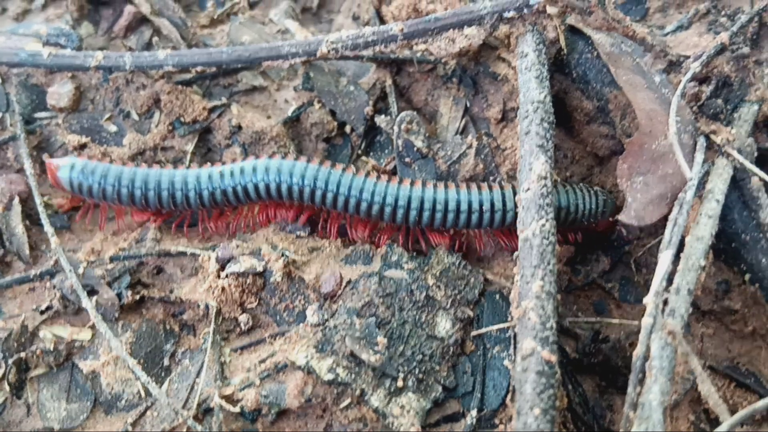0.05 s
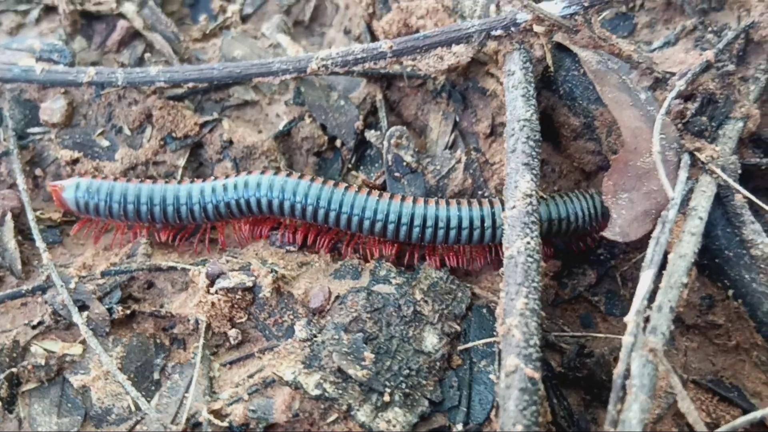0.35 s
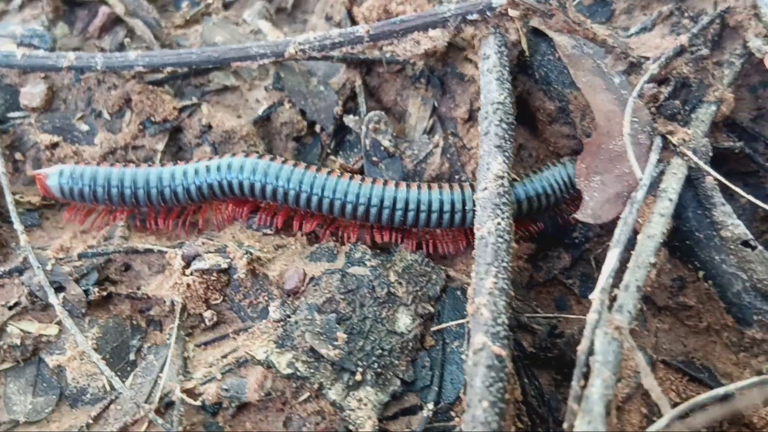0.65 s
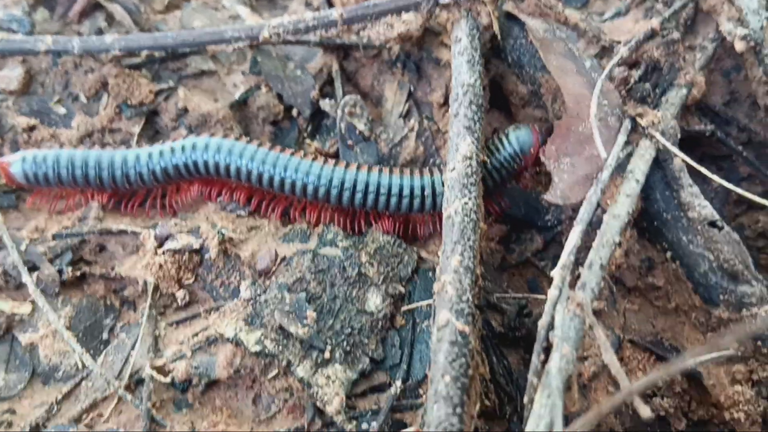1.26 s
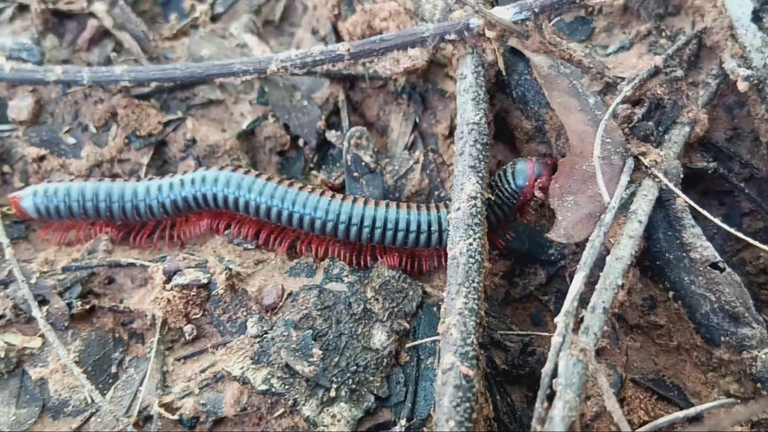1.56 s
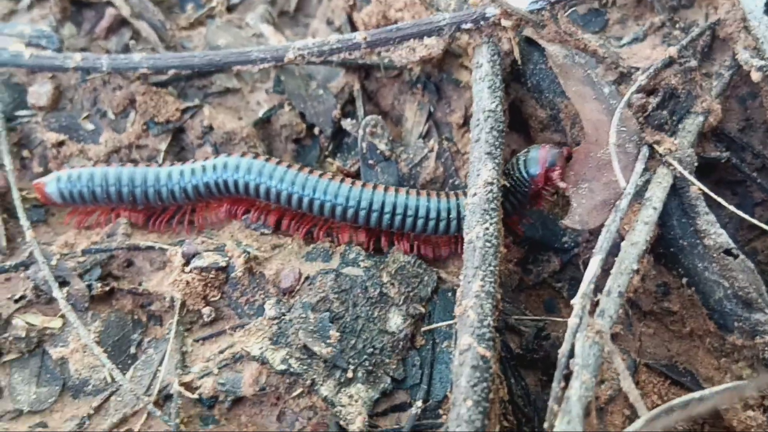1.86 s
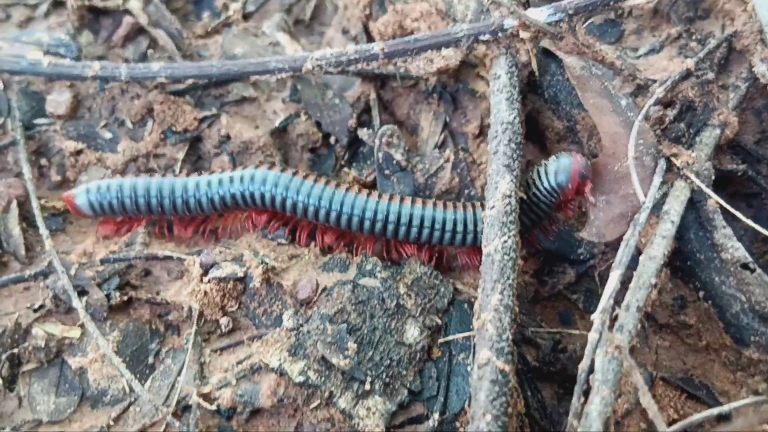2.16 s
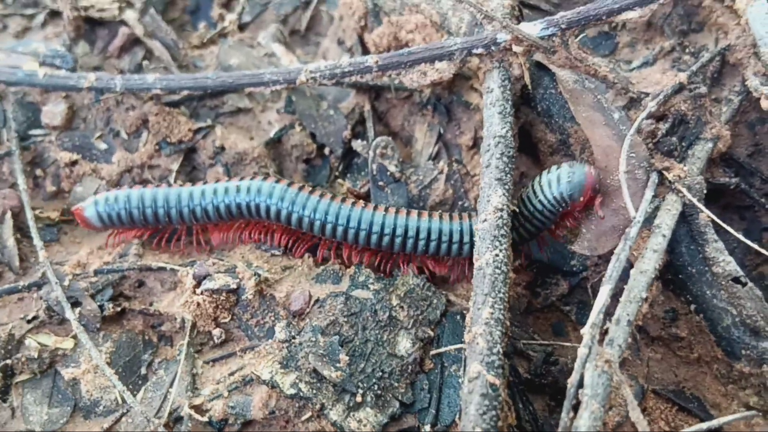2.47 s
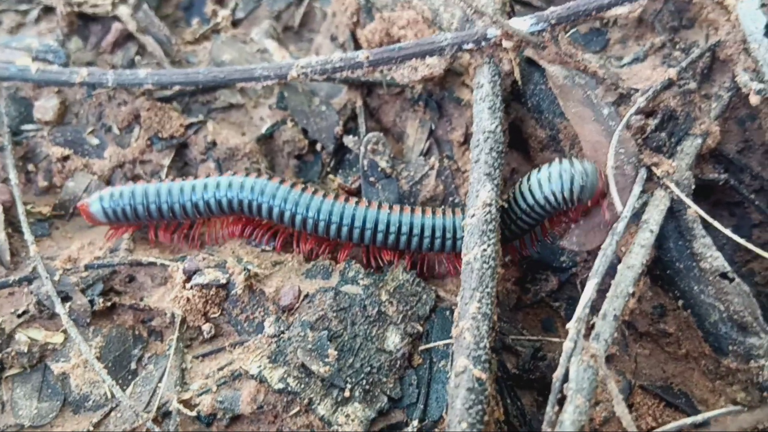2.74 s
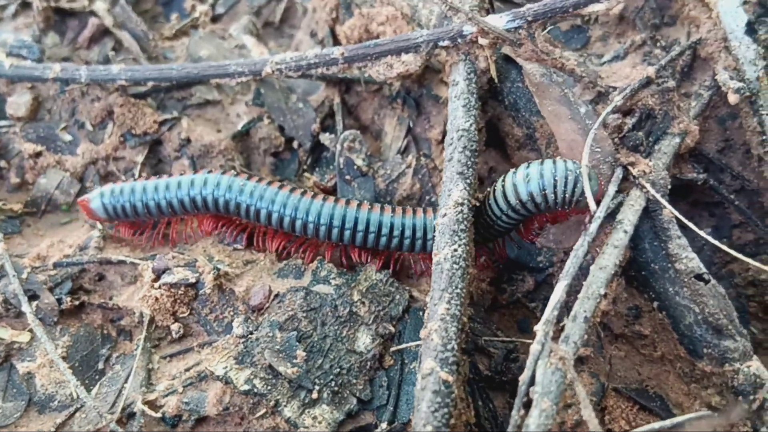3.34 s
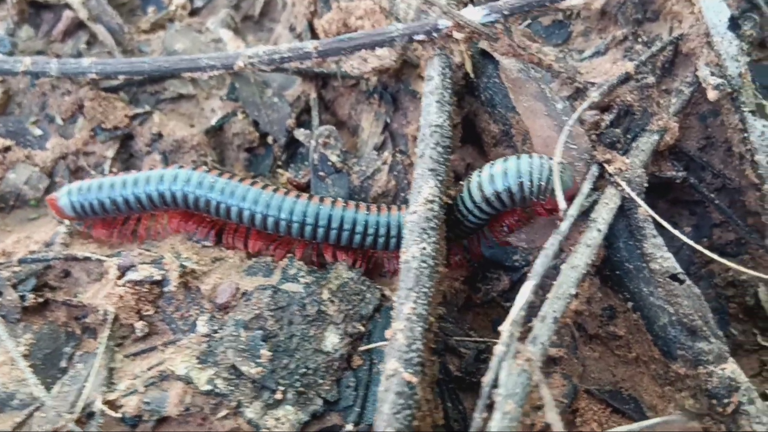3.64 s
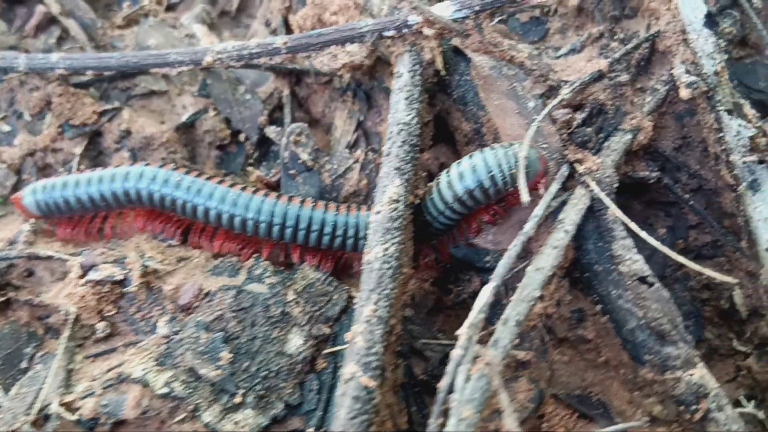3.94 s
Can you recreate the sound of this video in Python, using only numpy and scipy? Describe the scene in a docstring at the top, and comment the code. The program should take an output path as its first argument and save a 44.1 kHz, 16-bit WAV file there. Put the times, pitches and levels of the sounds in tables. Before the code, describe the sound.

A passing vehicle's rumble and distant hum grow into a rushing roar and hiss.

```python
"""A vehicle passing on a road

A motor vehicle approaches and passes two microphones close to the ground. Its exhaust rumbles
throughout; a far tyre hum grows into a roar and a bright hiss, loudest after about three seconds,
with two engine tones beneath. Its body rattles twice. Before that an insect buzzes faintly, a leaf
rustles and the microphones take a few soft bumps. All but the tones and bumps is shaped noise."""
import sys
import numpy as np
from scipy import signal
from scipy.fft import rfft, irfft
from scipy.io import wavfile
from scipy.ndimage import uniform_filter1d, minimum_filter1d

SR = 44100
rng = np.random.default_rng(int(sys.argv[2]) if len(sys.argv) > 2 else 0)


def generate_wav(sig):
    """Save sig (samples, or channels by samples) to the path in sys.argv[1] as 16-bit PCM at SR."""
    pcm = np.round(np.clip(np.atleast_2d(sig).T, -1, 1) * 32767).astype(np.int16)
    wavfile.write(sys.argv[1], SR, pcm)


N = 176400

# envelope of the tyre roar, which the engine tones also follow: (time [s], level [dB])
ROAR_LEVEL = [(0, -44.5), (1.1, -25), (1.45, -20.5), (1.65, -17), (2, -12.5), (2.3, -8), (2.65, -5.5),
              (2.95, -1.1), (3.25, -0.3), (3.45, -3), (3.8, -2.5), (4, -2)]


def from_db(db):
    """Amplitude grows tenfold for every 20 dB."""
    return 10 ** (np.asarray(db) / 20)


def unit_rms(x):
    """Normalisation to a mean power of 1."""
    return x / np.sqrt(np.mean(x ** 2) + 1e-20)


def seconds():
    """The time of each sample."""
    return np.arange(N) / SR


def bin_hz():
    """The frequency of each Fourier bin."""
    return np.arange(N // 2 + 1) * SR / N


def in_time(rows):
    """Linear interpolation of (time [s], value) rows."""
    return np.interp(seconds(), *np.transpose(rows))


def at_hz(rows, hz):
    """Interpolation of every column of a table on a log-frequency axis."""
    points, *columns = np.transpose(rows)
    return np.array([np.interp(np.log(hz), np.log(points), c) for c in columns])


def drift(rate_hz):
    """Low-passed noise gives slow random motion with a spread of 1."""
    step, settling = 40, 2000
    pole = np.exp(-2 * np.pi * rate_hz * step / SR)
    noise = rng.standard_normal(N // step + settling + 2)
    slow = signal.lfilter([1], [1, -2 * pole, pole * pole], noise)[settling:]
    return np.interp(np.arange(N) / step, np.arange(len(slow)), unit_rms(slow))


def stereo_noise(spectrum):
    """Coloured noise at spaced microphones loses coherence as the wavelength shortens."""
    # likeness of the two microphones: (frequency [Hz], coherence [0-1])
    likeness = [(200, 1), (400, 0.62), (650, 0.81), (1000, 0.53), (1500, 0.26), (3000, 0.24), (6000, 0.08)]
    # phase of the left microphone relative to the right: (frequency [Hz], phase [rad])
    left_phase = [(430, -1.64), (620, -2.5), (750, -2.5), (950, -3), (1400, -4), (2000, -8.5),
                  (3200, -11.5)]
    hz = np.maximum(bin_hz(), 1)
    left, independent = rfft(rng.standard_normal((2, N)))
    coherence = at_hz([(110, .998)] + list(likeness), hz)[0]
    phase = at_hz(left_phase, hz)[0] * np.minimum(hz / left_phase[0][0], 1)  # a pure delay in the bass
    right = (coherence * left + np.sqrt(1 - coherence ** 2) * independent) * np.exp(-1j * phase)
    roll_off = np.minimum(hz / spectrum[0][0], 1) ** 4 * np.minimum(spectrum[-1][0] / hz, 1) ** 8
    return irfft(np.array([left, right]) * from_db(at_hz(spectrum, hz)) * roll_off * np.sqrt(SR / 2), N)


def narrow_noise(hz, width_hz):
    """Random modulation in quadrature spreads a tone into a thin band of noise."""
    phase = 2 * np.pi * np.cumsum(hz) / SR
    return drift(width_hz) * np.cos(phase) + drift(width_hz) * np.sin(phase)


def airy_note(curve, width_hz, right_db):
    """Narrow-band noise is heard as a pitch; it glides, incoherent between the microphones."""
    times, hz, db = np.transpose(curve)
    pitch, level = np.interp(seconds(), times, hz), np.interp(seconds(), times, db)
    left, right = narrow_noise(pitch, width_hz), narrow_noise(pitch, width_hz)
    return np.array([left, from_db(right_db) * right]) * from_db(level)


def split_bands(x, band_of_bin, count):
    """A bank of overlapping triangular filters divides a sound into bands."""
    spectrum = rfft(x)
    return (irfft(spectrum * np.maximum(1 - abs(band_of_bin - k), 0), N) for k in range(count))


def flutter(x, shared_db, octave_db, rate_hz):
    """Amplitude modulation by air and road: the level wavers as a whole and octave by octave."""
    octave = np.log2(np.maximum(bin_hz() / 32, 1))
    out = sum(band * from_db(octave_db * drift(rate_hz)) for band in split_bands(x, octave, 10))
    return out * from_db(shared_db * drift(rate_hz))


def shimmer(x, depth_db, rate_hz, count=44):
    """Frequency-selective fading: over a long path, narrow bands swell and sink independently."""
    place = np.interp(np.log(np.maximum(bin_hz(), 1)), np.log([400, 12000]), [0, count - 1])
    return sum(band * from_db(depth_db * drift(rate_hz)) for band in split_bands(x, place, count))


def scatter(x, share, spread_s, count=12):
    """Comb filtering: short echoes from the ground and plants interfere with the direct sound."""
    out = x.copy()
    for channel in range(2):
        for delay, sign in zip(rng.random(count), rng.choice([-1, 1], count)):
            echo = np.roll(x[channel], int((0.1018 + delay) * spread_s * SR))
            out[channel] += sign * share / np.sqrt(count) * echo
    return out / np.sqrt(1 + share ** 2)


def brighten(x, tilt, hinge_hz):
    """Spectral tilt above a hinge: the treble comes through only when the vehicle is close."""
    octave = np.log2(np.maximum(bin_hz() / hinge_hz, 1))
    slope = in_time(tilt)
    return sum(band * from_db(k / 2 * slope) for k, band in enumerate(split_bands(x, 2 * octave, 7)))


def outdoor_air():
    """Ambient noise: a faint hiss that fades band by band."""
    # spectral density of the hiss: (frequency [Hz], left [dB], right [dB])
    spectrum = [(400, -97, -106), (2000, -117, -125), (4000, -105, -109), (5400, -112, -106),
                (6600, -99, -110), (7750, -105, -105), (8300, -115, -105), (9400, -122, -92.5),
                (10040, -127, -95), (11370, -129, -112), (15500, -127, -125)]
    return shimmer(stereo_noise(spectrum), depth_db=2.2, rate_hz=12)


def leaf_rustle():
    """A dry leaf shifts nearby: a burst of treble noise under a Gaussian envelope."""
    # spectral density at the peak: (frequency [Hz], left [dB], right [dB])
    spectrum = [(6000, -108, -110), (6800, -89, -96), (7400, -106, -104), (8500, -100, -95),
                (10000, -112, -89), (12000, -118, -104)]
    peak_s, spread_s = 1.135, 0.02
    return stereo_noise(spectrum) * np.exp(-.5 * ((seconds() - peak_s) / spread_s) ** 2)


def insect():
    """Narrow-band noise makes two short buzzes and a thin whine that arches in pitch."""
    # course of the whine: (time [s], pitch [Hz], level [dB])
    whine = [(1.2, 7600, -92), (1.33, 7660, -71), (1.73, 7780, -67.5), (1.97, 7680, -69), (2.13, 7500, -62),
             (2.35, 7450, -88)]
    # buzzes: (start [s], duration [s], level [dB], centre [Hz], bandwidth [Hz], right gain [dB])
    buzzes = [(0.49, 0.45, -61.5, 6600, 420, -8), (1.62, 0.75, -60, 6620, 400, -7)]
    fade_s, t = 0.18, seconds()
    out = airy_note(whine, width_hz=32, right_db=-10)
    for start, duration, db, hz, width_hz, right_db in buzzes:
        band = signal.butter(2, [hz - width_hz / 2, hz + width_hz / 2], "band", fs=SR, output="sos")
        envelope = np.clip(np.minimum(t - start, start + duration - t) / fade_s, 0, 1)
        flicker = from_db(2.4 * drift(40))
        buzz = unit_rms(signal.sosfilt(band, rng.standard_normal((2, N))))
        out += envelope * flicker * buzz * from_db([[db], [db + right_db]])
    return out


def microphone_bumps():
    """Soft knocks excite heavily damped oscillations, mostly in the left microphone."""
    # knocks: (time [s], envelope peak [dB], frequency [Hz], rise time [s], right gain [dB])
    knocks = [(.535, -33, 560, .0026, -13), (.658, -9, 135, .004, -6), (.7505, -14.5, 320, .0025, -16),
              (1.053, -10, 75, .005, -6), (1.446, -5, 105, .0045, -6)]
    out = 0
    for start, db, hz, rise_s, right_db in knocks:
        age = np.maximum(seconds() - start, 0)
        envelope = (age / rise_s * np.exp(1 - age / rise_s)) ** 2
        out += from_db([[db], [db + right_db]]) * envelope * np.sin(2 * np.pi * hz * age)
    return out


def far_resonances():
    """Resonances in the distant road noise waver in pitch and fade independently."""
    # resonant bands: (centre [Hz], width [Hz], level before the envelope [dB])
    resonances = [(703, 36, -61.5), (907, 40, -62), (1376, 40, -57.5), (1648, 40, -57.5), (1815, 37, -62.5),
                  (2020, 35, -64.5), (2410, 50, -66), (3360, 60, -75), (3760, 100, -69.5)]
    # their common envelope: (time [s], level [dB])
    envelope = [(0, -7), (.3, 0), (.8, -1), (1.4, 3.5), (2.2, 5), (3, 6)]
    wander, fading_db, right_db = .008, 4, -7
    out = 0
    for hz, width_hz, db in resonances:
        pitch = hz * (1 + wander * drift(3.95))
        left, independent = narrow_noise(pitch, width_hz), narrow_noise(pitch, width_hz)
        right = from_db(right_db) * (independent - left) / np.sqrt(2)  # partly in antiphase
        out += from_db(db + fading_db * drift(7.7)) * np.array([left, right])
    return out * from_db(in_time(envelope))


def tyre_hum():
    """Distant rolling noise fades in patches and steadies as the path shortens."""
    # spectral density of the hum: (frequency [Hz], left [dB], right [dB])
    spectrum = [(500, -80, -73), (730, -71.5, -72.5), (856, -61, -68), (1000, -62, -71), (1110, -65.5, -69),
                (1240, -61, -70.5), (1960, -63.5, -69.5), (2415, -65.5, -69), (3220, -74, -76),
                (3580, -74, -83.5), (3930, -74, -84.5), (4470, -93, -86.5), (5400, -102, -93.5),
                (6400, -85, -85), (7730, -87.5, -93.5), (9300, -121, -79), (12000, -155, -109)]
    # fading of its narrow bands: (time [s], depth [dB])
    fading = [(0, 4.5), (1.4, 4), (2.3, 1.5)]
    # its envelope: (time [s], level [dB])
    envelope = [(0, -31.5), (0.6, -22), (0.9, -21.5), (1.4, -16.5), (1.8, -7.5), (2.2, -4), (2.6, -0.5),
                (3.2, 0.5), (4, -6.5)]
    hum = shimmer(stereo_noise(spectrum), depth_db=in_time(fading), rate_hz=9.8)
    return flutter(hum, shared_db=0.6, octave_db=0.95, rate_hz=21) * from_db(in_time(envelope))


def tyre_singing():
    """A spectral peak in the tyre noise sings out early in the approach."""
    # spectral density of the peak: (frequency [Hz], left [dB], right [dB])
    spectrum = [(1170, -85.5, -97), (1344, -73, -80.5), (1660, -80.5, -98)]
    # its envelope: (time [s], level [dB])
    envelope = [(0, -31), (.89, -17), (.93, -1), (1.1, -3), (1.38, 5.5), (1.55, 5.5), (2, 1)]
    return stereo_noise(spectrum) * from_db(in_time(envelope))


def high_ringing():
    """Narrow-band noise rings near 6.7 kHz, swells with the passing hiss and sinks slightly in pitch."""
    # course of the ringing: (time [s], pitch [Hz], level [dB])
    ringing = [(2.3, 6850, -75), (2.65, 6820, -52), (2.95, 6770, -42), (3.2, 6640, -45), (3.5, 6600, -60),
               (4, 6560, -53)]
    return airy_note(ringing, width_hz=77, right_db=-2)


def body_rattles():
    """The body clatters in noise bursts with a linear attack and an exponential decay."""
    # clatters: (time [s], peak gain [dB])
    clatters = [(3.439, -23), (3.741, -26)]
    # their spectral density: (frequency [Hz], left [dB], right [dB])
    spectrum = [(900, -24, -42), (2500, -37.5, -37), (3900, -27, -42), (4960, -50, -42), (6740, -40, -38.5),
                (10000, -67, -58)]
    attack_s, t60_s = 0.0047, 0.069
    envelope = 0
    for start, db in clatters:
        age = np.maximum(seconds() - start, 0)
        decay_db = 60 * np.maximum(age - attack_s, 0) / t60_s
        envelope += np.minimum(age / attack_s, 1) * from_db(db - decay_db)
    return envelope * stereo_noise(spectrum)


def tyre_hiss():
    """High-frequency rolling noise, combed by echoes, is heard only at close range."""
    # spectral density of the hiss: (frequency [Hz], left [dB], right [dB])
    spectrum = [(1170, -64, -65), (1730, -64.5, -62), (2450, -60, -67.5), (3420, -64, -66),
                (3730, -57, -70.5), (3930, -60, -70), (4300, -67.5, -70), (5170, -74, -69.5),
                (5600, -71, -66), (6150, -70, -69.5), (6500, -66.5, -66.5), (6800, -66.5, -66.5),
                (7110, -74.5, -70.5), (8160, -82, -70), (9470, -88, -66.5), (10550, -97, -72.5),
                (11300, -103, -76), (13000, -110, -85), (15500, -114, -97)]
    # its brightness: (time [s], slope above the hinge [dB/octave])
    tilt = [(1.6, -9), (2.2, -1), (2.4, -0.5), (2.6, -1), (2.75, 0.3), (3, 1.4), (3.4, -1.5), (3.52, -1.2),
            (4, -2.2)]
    # its envelope: (time [s], level [dB])
    envelope = [(1.6, -50), (2.1, -26), (2.35, -17), (2.55, -11), (2.75, -5.5), (3, -0.8), (3.1, -3),
                (3.27, 0), (3.43, -4.5), (3.51, -6.5), (3.75, -3.5), (4, -2.5)]
    hiss = scatter(stereo_noise(spectrum), share=0.25, spread_s=.012)
    hiss = flutter(hiss, shared_db=0.78, octave_db=0.94, rate_hz=22)
    return brighten(hiss, tilt, hinge_hz=4000) * from_db(in_time(envelope))


def tyre_roar():
    """Low and midrange rolling noise grows louder and brighter as the distance shrinks."""
    # spectral density of the roar: (frequency [Hz], left [dB], right [dB])
    spectrum = [(144, -47, -53.5), (217.5, -36.5, -43), (288, -40, -47.5), (445, -46.5, -51.5),
                (521, -43.5, -55.5), (585, -47.5, -57.5), (720, -46.5, -55.5), (904, -49, -54.5),
                (1287, -55, -63), (1540, -76.5, -77), (2500, -66.5, -85)]
    # its brightness: (time [s], slope above the hinge [dB/octave])
    tilt = [(1, -8), (1.6, -7.5), (2.1, -5), (2.6, -1.5), (3.2, 1.5), (4, 0.9)]
    roar = scatter(stereo_noise(spectrum), share=0.14, spread_s=.02)
    roar = flutter(roar, shared_db=0.34, octave_db=0.97, rate_hz=11.7)
    return brighten(roar, tilt, hinge_hz=400) * from_db(in_time(ROAR_LEVEL))


def engine_drone():
    """Two engine tones, randomly modulated in frequency and amplitude, swell with the roar."""
    # tones: (frequency [Hz], rms level at full roar [dB], wander [fraction of frequency])
    tones = [(62.14, -20.5, 0.05), (229.6, -25, 0.02754)]
    right_db, right_lead_s = -2.5, 0.0002  # the tones reach the right microphone slightly earlier
    swell_db = 0.79 * in_time(ROAR_LEVEL)
    out = np.zeros((2, N))
    for hz, db, wander in tones:
        phase = 2 * np.pi * np.cumsum(hz * (1 + wander * drift(12.24))) / SR
        amplitude = np.sqrt(2) * from_db(db + 2.35 * drift(7.2) + swell_db)
        right = from_db(right_db) * np.sin(phase + 2 * np.pi * hz * right_lead_s)
        out += amplitude * np.array([np.sin(phase), right])
    return out


def exhaust():
    """Low-frequency noise carries far, so the uneven rumble is heard throughout."""
    # spectral density of the rumble: (frequency [Hz], left [dB], right [dB])
    spectrum = [(20, -66, -61), (34.2, -38, -43), (57, -31.5, -40), (130.6, -31.5, -37), (179, -39, -48),
                (228, -44, -48.5), (285, -55.5, -66.5), (437, -66.5, -75), (700, -91.5, -88)]
    # its envelope: (time [s], level [dB])
    envelope = [(0, -15.5), (0.35, -11.5), (0.7, -5), (1.1, -5.5), (1.4, -5), (2, -9), (2.3, -2.5),
                (2.6, -3.5), (3.25, 0), (3.6, -2.5), (4, -3)]
    rumble = flutter(stereo_noise(spectrum), shared_db=.5, octave_db=0.6, rate_hz=5.4)
    return rumble * from_db(in_time(envelope))


def vehicle():
    """Engine, tyres and body; a growing path difference delays the engine on the left as it crosses."""
    # arrival at the left microphone: (time [s], added delay [s])
    left_delay = [(0, -.0001), (1.2, -.00008), (2.2, 0), (3, .00017), (4, .00022)]
    left, right = exhaust() + engine_drone()
    delayed_left = np.interp(seconds() - in_time(left_delay), seconds(), left)
    tyres = tyre_hum() + tyre_singing() + tyre_roar() + tyre_hiss() + far_resonances()
    return np.array([delayed_left, right]) + tyres + high_ringing() + body_rattles()


def scene():
    """Superposition of the outdoor hiss, the vehicle and the small sounds nearby."""
    return outdoor_air() + vehicle() + microphone_bumps() + insect() + leaf_rustle()


def record(dry):
    """Peak limiting turns down the loudest moments; a steep low-pass filter cuts the top."""
    ceiling, window_s, cutoff_hz = .99, .008, 15700
    window = int(window_s * SR)
    needed_gain = ceiling / np.maximum(abs(dry).max(axis=0), ceiling)
    gain = uniform_filter1d(minimum_filter1d(needed_gain, window), window)
    low_pass = signal.ellip(12, .1, 80, cutoff_hz, fs=SR, output="sos")
    return signal.sosfilt(low_pass, dry * gain)


dry = scene()
out = record(dry)
generate_wav(out)
```